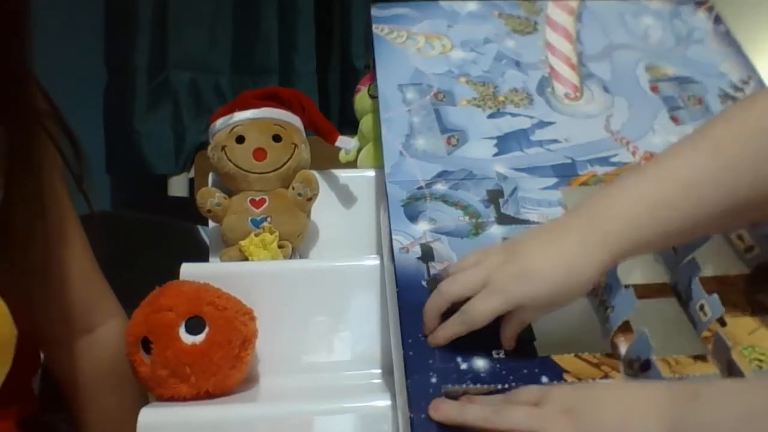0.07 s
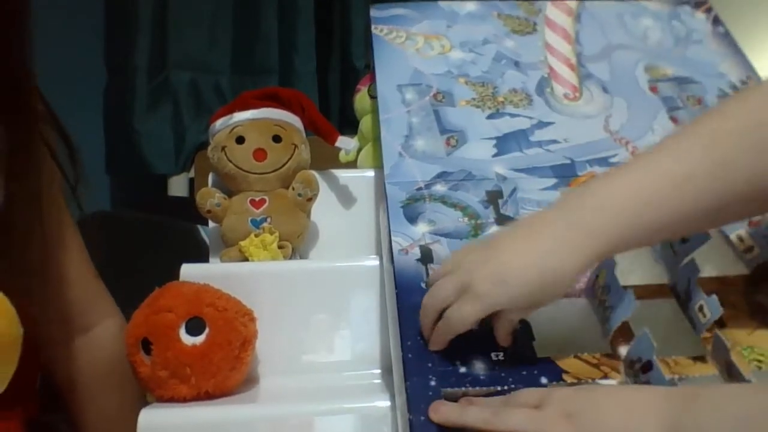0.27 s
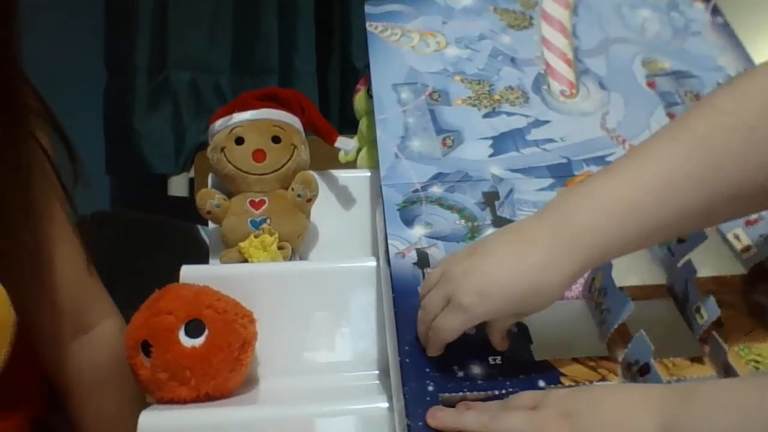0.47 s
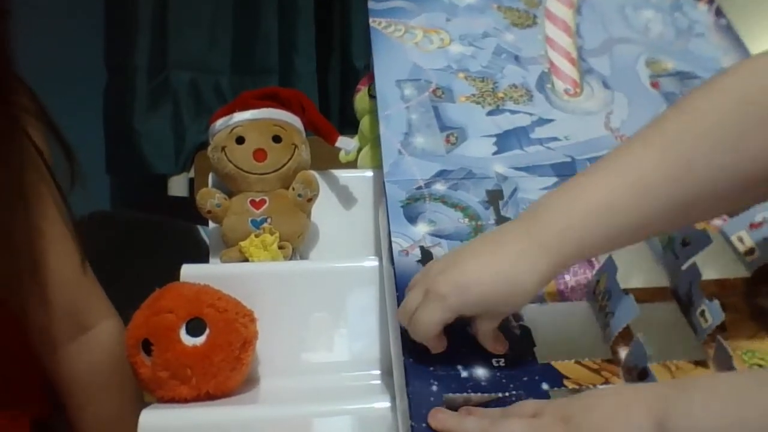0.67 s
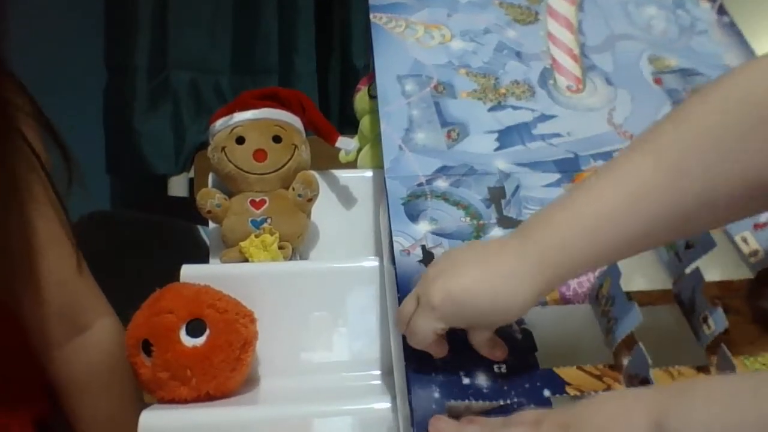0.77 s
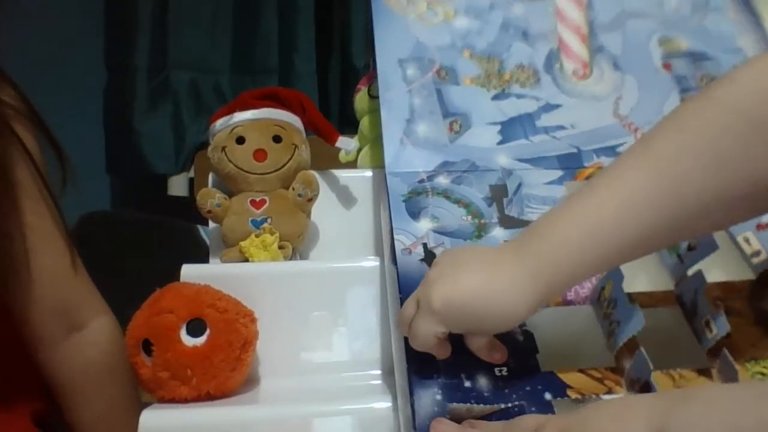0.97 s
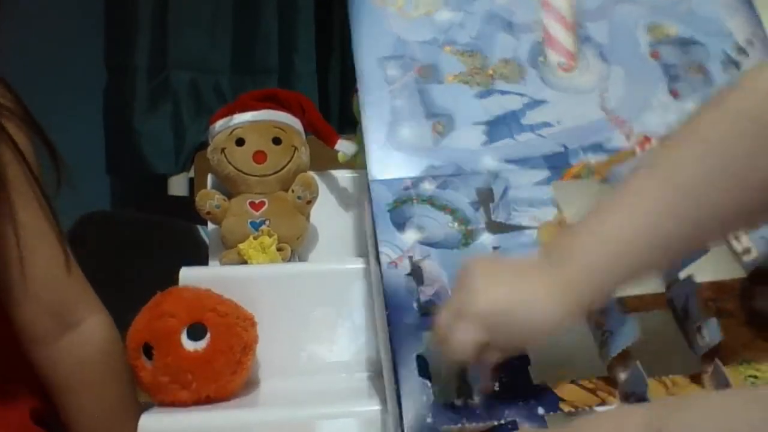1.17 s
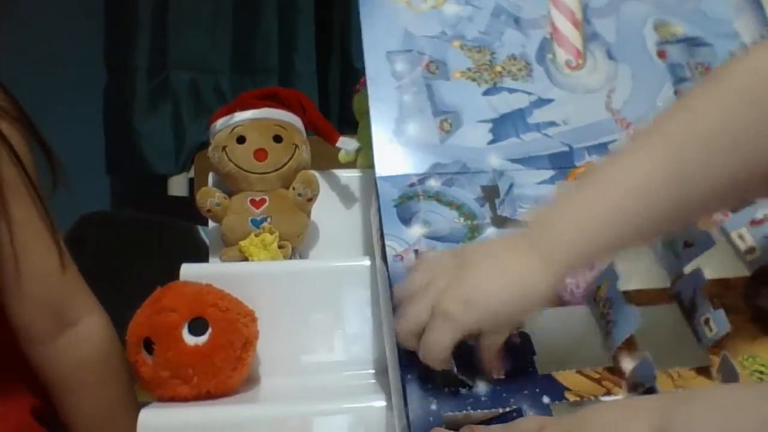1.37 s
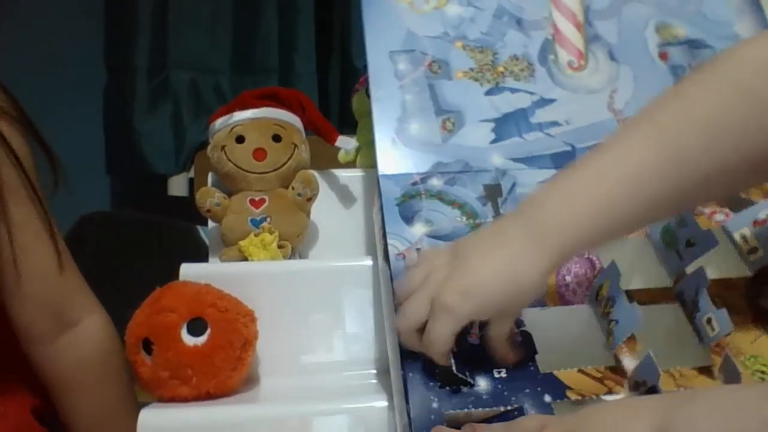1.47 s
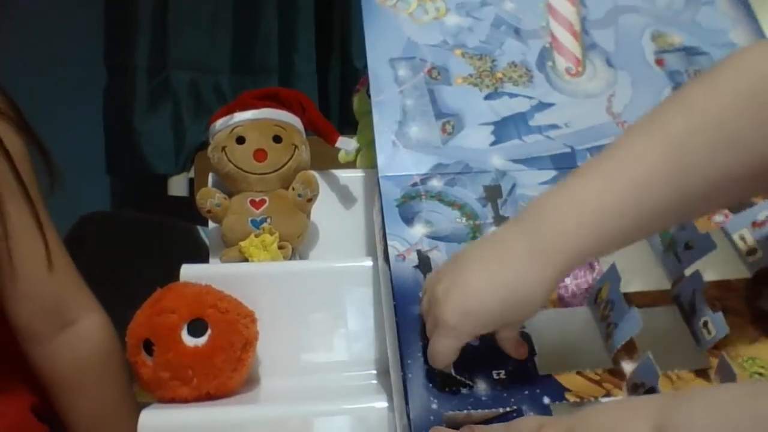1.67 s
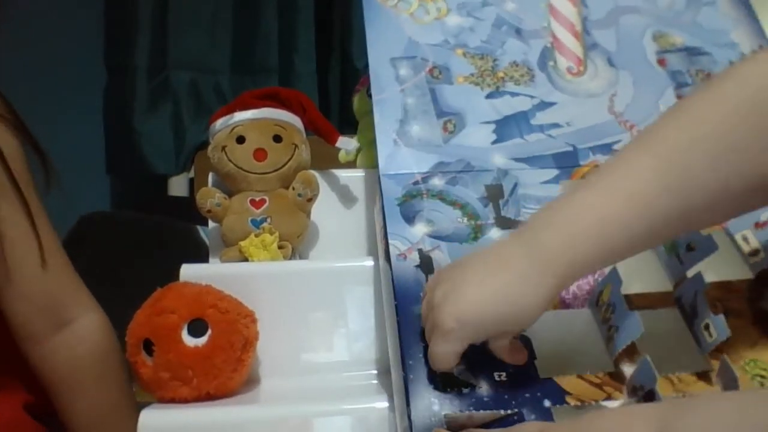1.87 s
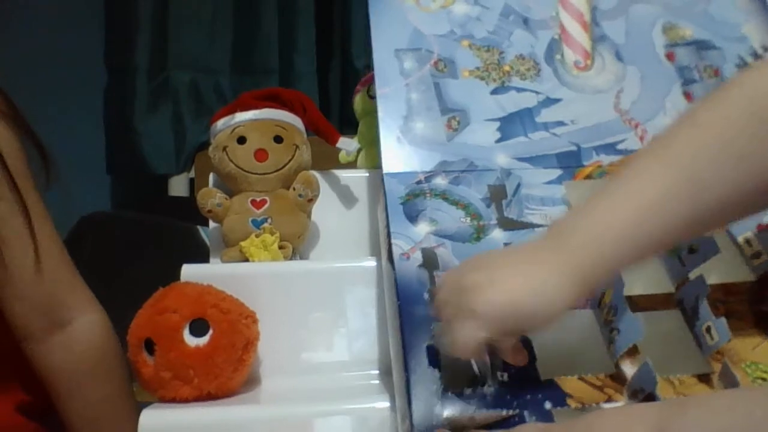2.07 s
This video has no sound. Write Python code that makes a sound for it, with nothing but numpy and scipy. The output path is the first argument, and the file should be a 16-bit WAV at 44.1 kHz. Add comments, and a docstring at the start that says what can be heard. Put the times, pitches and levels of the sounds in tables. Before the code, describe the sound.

A cardboard advent calendar door is torn open. Fingertips tap lightly, the card gives with a sharp crack, perforations crackle one by one, then it rips free in loud snaps, close to the microphone in a small room.

```python
"""In a small room, fingers press on the perforated door of a cardboard box, close to the microphone.
Fingertips tap and rub, and the strained card squeaks faintly until it fractures with a sharp crack.
The perforations crackle one by one, then the door rips free in a run of loud snaps, each a burst of
breaking fibres that rings the flap. The hollow box resonates, a noise suppressor shortens the
reverberation, and the loudest cracks overload the microphone."""
import sys
import numpy as np
from scipy import signal
from scipy.fft import rfft, irfft, next_fast_len
from scipy.io import wavfile
from scipy.ndimage import uniform_filter1d

SR = 44100
rng = np.random.default_rng(int(sys.argv[2]) if len(sys.argv) > 2 else 0)


def unload_wav(signal):
    """Save mono or channel-first audio to the path in sys.argv[1] as 16-bit WAV at rate SR, clipped to [-1, 1]."""
    wavfile.write(
        sys.argv[1],
        SR,
        np.round(np.clip(np.atleast_2d(signal).T, -1, 1) * 32767).astype(np.int16),
    )


N = 94065


def amp(db):
    """Amplitude ratio of a level in decibels."""
    return 10 ** (np.asarray(db) / 20)


def unit(x):
    """Normalisation to an rms of 1."""
    return x / np.sqrt(np.mean(x ** 2) + 1e-20)


def along(points, hz):
    """Interpolation of (frequency, value) points on a logarithmic axis."""
    f, v = np.transpose(points)
    return np.interp(np.log(hz + 1), np.log(f + 1), v)


def envelope(rows):
    """Amplitude envelope interpolated through (time, level) points."""
    return amp(np.interp(np.arange(N) / SR, *np.transpose(rows)))


def filtered(x, response):
    """Linear filtering: the spectrum is multiplied by a frequency response."""
    size = next_fast_len(N + SR // 2)
    return irfft(rfft(x, size) * response(np.fft.rfftfreq(size, 1 / SR)), size)[:N]


def minimum_phase(gain):
    """Causal response with this gain, by folding the cepstrum."""
    cepstrum = irfft(np.log(np.maximum(gain, 1e-6)))
    cepstrum[1:len(cepstrum) // 2] *= 2
    cepstrum[len(cepstrum) // 2 + 1:] = 0
    return np.exp(rfft(cepstrum))


# Spectrum of the room noise (frequency [Hz], level [dB])
AIR_SPECTRUM = [(100, -38), (135, -2.5), (190, 4), (420, -9), (1700, -9), (6300, -19.5), (9000, -44.5)]
# Envelope of the room noise (time [s], level [dB])
AIR_ENVELOPE = [(1.05, -67), (1.29, -73.5), (1.5, -68)]
def room_noise():
    """Coloured Gaussian noise: a faint background that dips after the first crack."""
    noise = filtered(rng.standard_normal(N), lambda hz: amp(along(AIR_SPECTRUM, hz)))
    return unit(noise) * envelope(AIR_ENVELOPE)


# Spectrum of an impulse in the card (frequency [Hz], level [dB])
CARD_SPECTRUM = [(100, -34.5), (170, -13.5), (400, -7), (900, -1), (1400, -2.5), (3000, -5.5), (4500, -9.5),
                 (6500, -12.5), (7600, -21.5), (8700, -41.5)]
def snap(t60, level_db, bass_db, treble_db, *flap_hz, size=4096):
    """Resonance and dispersion: a decaying burst rings the flap; bending waves carry the bass slowest."""
    t, hz = np.arange(size) / SR, np.fft.rfftfreq(size, 1 / SR)
    burst = rfft(rng.standard_normal(size) * amp(-60 * t / t60))
    burst /= 1
    ripple = np.sqrt(np.abs(uniform_filter1d(np.abs(burst) ** 2, size=21)))  # the burst's chance colour
    tilt_db = along([(400, bass_db), (950, 0), (1600, 0.0086), (4800, treble_db)], hz)
    peaks = 0
    for centre in flap_hz:
        half_width_hz = 21.3 + 0.022 * centre
        peaks += 1 / (1 + ((hz - centre) / half_width_hz) ** 2)
    flap = np.sqrt(1 + amp(14.5) ** 2 * peaks)
    card = minimum_phase(amp(along(CARD_SPECTRUM, hz) + tilt_db) * flap / ripple)
    group_delay_s = 0.005 / (1 + (hz / 436) ** 2) ** 2
    dispersion = np.exp(-2j * np.pi * np.cumsum(group_delay_s) * hz[1])
    fade = np.cos(np.pi / 2 * t / t[-1]) ** 2
    return irfft(burst * dispersion * card) * fade * amp(level_db)


def snaps(rows):
    """Superposition of snaps, each at its onset time."""
    track = np.zeros(N + SR)
    for onset, *shape in rows:
        one = snap(*shape)
        track[round(onset * SR):][:len(one)] += one
    return track[:N]


# Fingertip touches (time [s], level [dB])
TOUCHES = [(.042, -22), (0.068, -25), (0.103, -17.5), (0.423, -23), (.626, -31.5), (1.555, -29.5)]
def taps(t60=0.1, bass_db=8, treble_db=-2.5, flap_hz=537):
    """Impact excitation: fingertips strike the card lightly, with a dull sound."""
    return snaps([(onset, t60, db, bass_db, treble_db, flap_hz) for onset, db in TOUCHES])


# Spectrum of a slip on the card (frequency [Hz], level [dB])
SLIP_SPECTRUM = [(120, -16.5), (220, -2), (700, 5.5), (6500, -18), (8500, -34.5)]
def slips(per_s):
    """Shot noise: a random train of tiny slips, at an rms of 1."""
    clicks = (rng.random(N) < per_s / SR) * rng.standard_normal(N)
    return unit(filtered(clicks, lambda hz: minimum_phase(amp(along(SLIP_SPECTRUM, hz)))))


# Envelope of the friction (time [s], level [dB])
RUB_ENVELOPE = [(.28, -72), (.39, -61), (.46, -70), (.77, -67.5), (1.38, -75), (1.44, -52.5), (1.487, -63),
                (1.51, -74.5), (1.9, -75.5)]
def rubbing():
    """Stick-slip friction: skin and torn edges cross the card in dense, tiny slips."""
    return slips(per_s=1600) * envelope(RUB_ENVELOPE)


def squeak(start_s=0.86, pitch_hz=1410, width_hz=110, level_db=-70):
    """Narrow-band noise: the strained card squeaks until its first fracture."""
    t = np.arange(N) / SR
    tone = filtered(rng.standard_normal(N), lambda hz: np.exp(-((hz - pitch_hz) / width_hz) ** 2))
    strained = (t > start_s) & (t < FRACTURES[0][0])
    return unit(tone) * amp(level_db) * uniform_filter1d(1.0 * strained, size=900)


# Loud breaks of the card (time [s], burst T60 [s], level [dB], bass [dB], treble [dB],
# low flap resonance [Hz], middle flap resonance [Hz], high flap resonance [Hz])
FRACTURES = [(1.0775, 0.035, 16.66, -4.5, 7.5, 1430, 2795, 3433),
             (1.0814, 0.011, 18.3, -3.5, 5.5, 855, 1026, 1700),
             (1.0966, 0.0045, 6.1, -17, -1, 1030, 2930, 4210),
             (1.1094, 0.023, 8.5, 8.5, -2.5, 218, 1170, 2940), (1.1118, 0.0068, 4, 10, -13, 307, 586, 755),
             (1.120, 0.0083, 3.37, 5, 2, 658, 903, 3736), (1.9826, 0.011, 19.96, -3.5, -3, 856, 2655, 3210),
             (1.9837, 0.0089, 10.8, 11.5, -15.5, 314, 395, 653),
             (2.0011, .012, 18.4, 3, -5, 546, 710, 1030), (2.0241, 0.018, 18, 3, 1.5, 1426, 2504, 3500),
             (2.0255, .011, 19.2, -3, -2, 466.5, 915, 1014),
             (2.0451, 0.013, 13.4, 5.5, -3, 528, 1410, 1874), (2.103, 0.013, 2.3, 5.5, 2.5, 417, 623, 800)]
def cracks():
    """Fracture releases strain energy: the door gives, and later rips free."""
    return snaps(FRACTURES)


def fibres(relative_db=-46.5, t60=0.3):
    """Incoherent sources add in power: stray fibres part in a fading crackle after each loud break."""
    t = np.arange(N) / SR
    power = 0
    for onset, _, db, *_ in FRACTURES:
        power += (t > onset) * amp(db + relative_db - 60 * np.abs(t - onset) / t60) ** 2
    return slips(per_s=450) * np.sqrt(power)


# Modes of the hollow box (frequency [Hz], level [dB], T60 [s])
BOX_MODES = [(183, 4, 0.14), (312, -0.5, 0.1), (373, -9.5, 0.23), (534, -4, 0.22), (1400, -4, 0.25),
             (1990, -6.5, 0.23), (2445, -2, 0.12)]
def box(x):
    """Modal resonance: panels and cavity ring as damped oscillators of alternating polarity."""
    def modes(hz):
        total = 0
        for k, (mode_hz, db, t60) in enumerate(BOX_MODES):
            damping = 1j * hz * np.log(1000) / (np.pi * t60)
            total += (-1) ** k * amp(db) * damping / (mode_hz ** 2 - hz ** 2 + damping)
        return total
    return filtered(x, modes)


# Reverberation time (frequency [Hz], T60 [s])
ROOM_DECAY = [(200, 0.23), (7000, 0.34)]
# Colour of the reverberation (frequency [Hz], level [dB])
ROOM_SPECTRUM = [(800, 2), (3000, -4.5), (7000, -7)]
def room(x):
    """Reverberation: a diffuse field decays exponentially, each frequency at its own rate."""
    hz, t, noise = signal.stft(rng.standard_normal(SR // 2), SR, nperseg=256)
    decay = amp(-60 * t / along(ROOM_DECAY, hz)[:, None])
    _, response = signal.istft(noise * decay, SR, nperseg=256)
    tail = signal.fftconvolve(x, response / np.linalg.norm(response))[:N]
    return filtered(tail, lambda f: amp(along(ROOM_SPECTRUM, f)))


def suppressor(x, threshold_db=-44.5, slope=1.57, depth_db=22.5):
    """Downward expansion: the gain falls as the level sinks below a threshold."""
    level_db = 10 * np.log10(np.abs(uniform_filter1d(x ** 2, size=700)) + 1e-12)
    return x * amp(np.clip(slope * (level_db - threshold_db), -depth_db, 0))


# Perforations giving way (time [s], burst T60 [s], level [dB], bass [dB], treble [dB],
# low flap resonance [Hz], middle flap resonance [Hz], high flap resonance [Hz])
PERFORATIONS = [(1.3442, 0.031, -2, 2.5, 5, 1244, 1770, 3155), (1.3500, 0.052, -6, 10.5, -4, 380, 558, 960),
                (1.361, 0.052, -5.5, 4, 1.5, 532, 3155, 6020),
                (1.4085, 0.014, -1.5, -1, 4.5, 723, 1392, 3370),
                (1.412, 0.066, -6, 10.5, -1, 210.5, 493, 650), (1.433, .022, -9.5, 10, 1, 403, 630, 795),
                (1.450, 0.19, -9, 8, 8, 187, 626, 1802), (1.480, 0.023, -7, 0, 8, 551, 986, 2850),
                (1.5912, .06, -7, 9, 8, 198, 1070, 1714), (1.5947, 0.059, -2.5, 4.5, 1, 462, 707, 1014),
                (1.7735, 0.026, -13, -3, 11.5, 642, 2860, 5910),
                (1.7797, 0.025, 1.5, 2.5, 1, 754, 980, 1700), (1.8508, 0.02, 3, -5, 5.5, 543, 903, 6020),
                (1.854, .06, -9.5, -13, 6.5, 826, 1930, 2980),
                (1.885, 0.019, -16, -30, 9, 1800, 3420, 4400),
                (1.9016, 0.02, -7, 6, 15.5, 1824, 4660, 6710)]
def crackles():
    """Progressive fracture: the small perforations fail one by one."""
    return snaps(PERFORATIONS)


def scene():
    """Superposition: direct sound adds to the suppressed decay of box, room and fibres."""
    loud, small = cracks(), crackles()
    ring = box(amp(-12.5) * loud + amp(-9) * small)
    tail = room(amp(-6.5) * loud + amp(-11.5) * small)
    decay = suppressor(ring + tail + fibres())
    return (loud + small + decay + taps() + rubbing() + squeak() + room_noise())[None]


def record(dry):
    """Saturation and band limiting: the microphone drops deep bass, clips peaks and cuts high treble."""
    ceiling, hardness, top_hz = 0.97, 8, 8900
    x = signal.sosfilt(signal.butter(2, 100, 'high', fs=SR, output='sos'), dry[0])
    clipped = x / (1 + np.abs(x / ceiling) ** hardness) ** (1 / hardness)
    return filtered(clipped, lambda hz: 1 / np.sqrt(1 + (hz / top_hz) ** 60))[None]


dry = scene()
out = record(dry)
unload_wav(out)
```